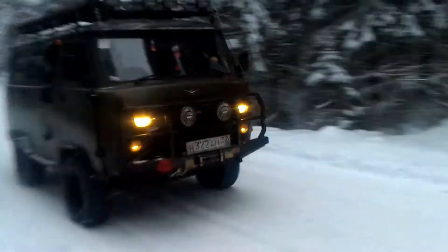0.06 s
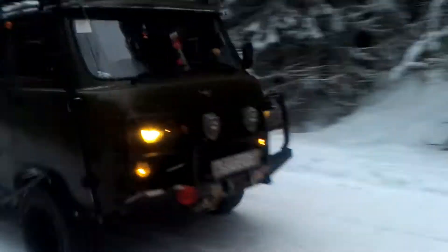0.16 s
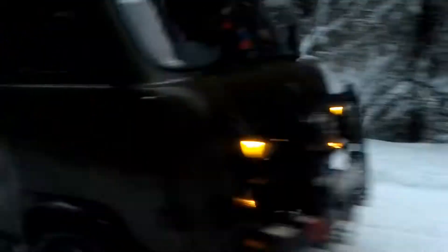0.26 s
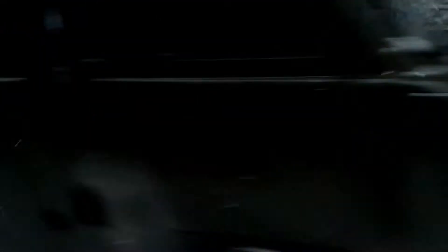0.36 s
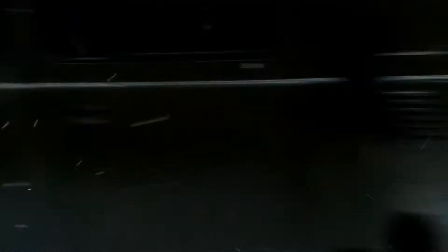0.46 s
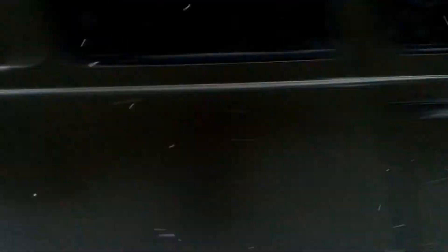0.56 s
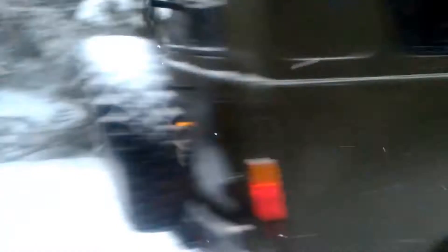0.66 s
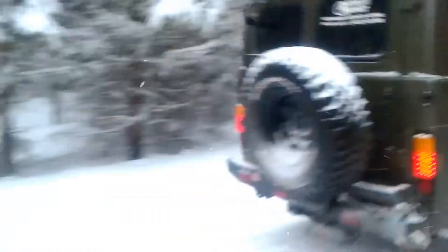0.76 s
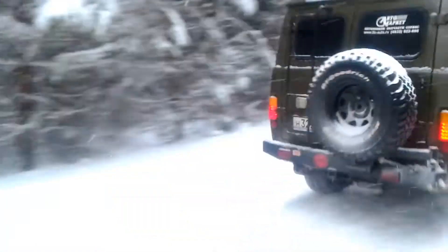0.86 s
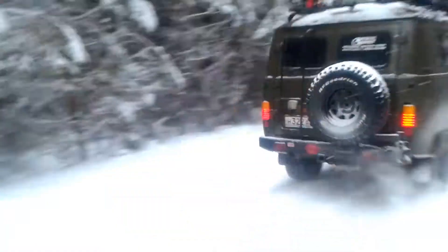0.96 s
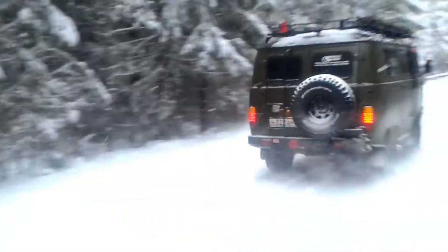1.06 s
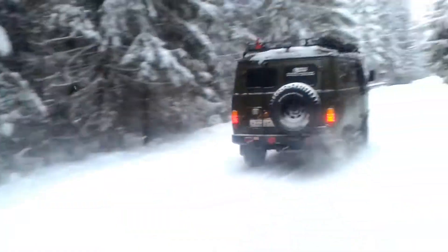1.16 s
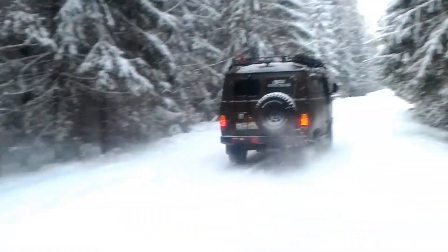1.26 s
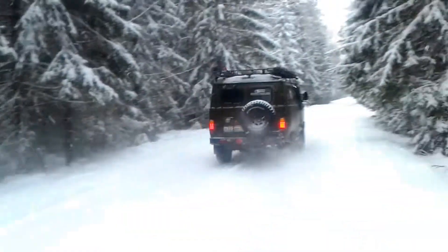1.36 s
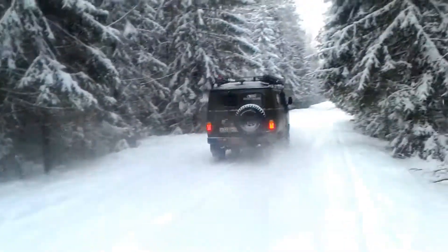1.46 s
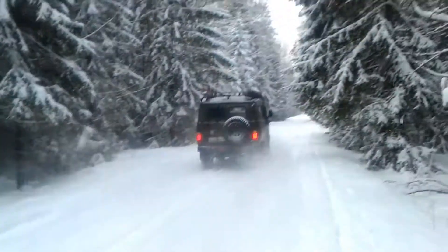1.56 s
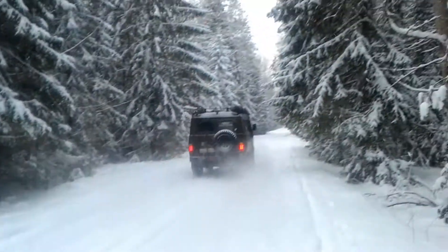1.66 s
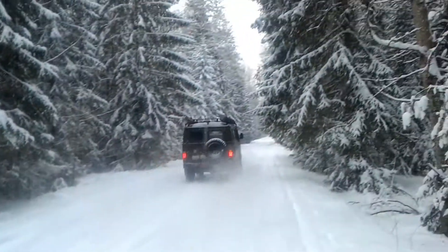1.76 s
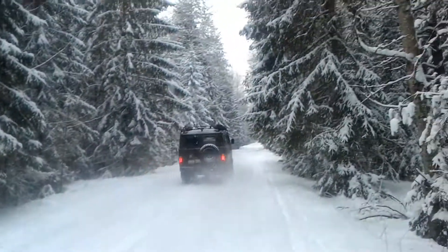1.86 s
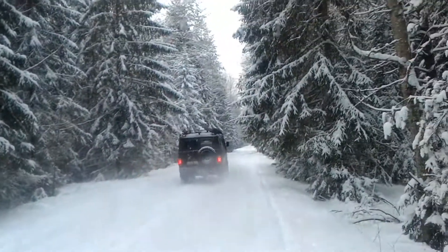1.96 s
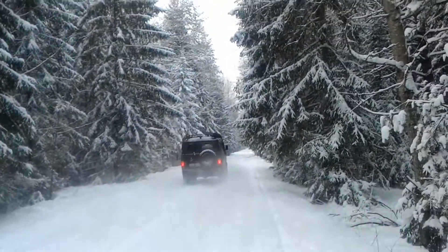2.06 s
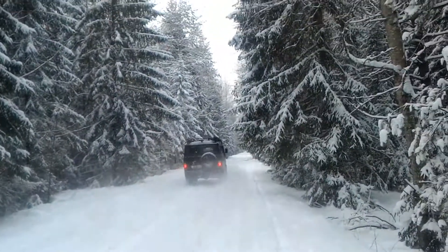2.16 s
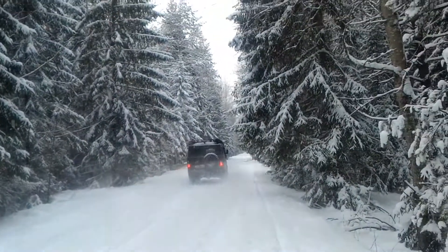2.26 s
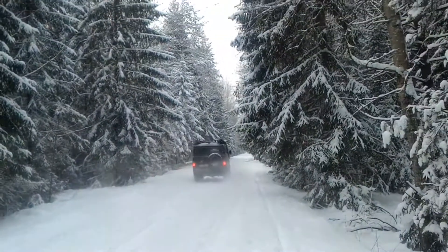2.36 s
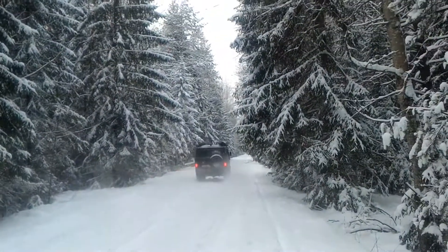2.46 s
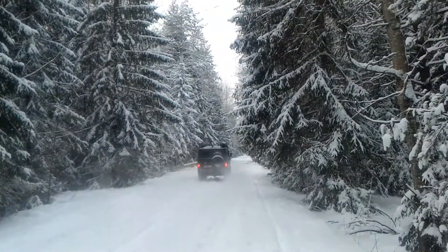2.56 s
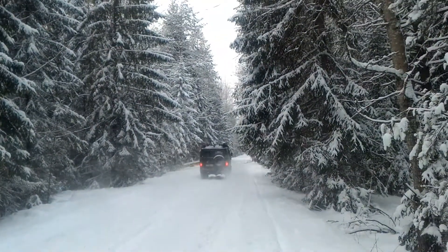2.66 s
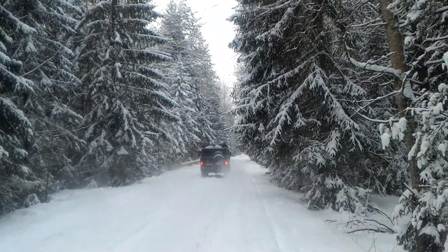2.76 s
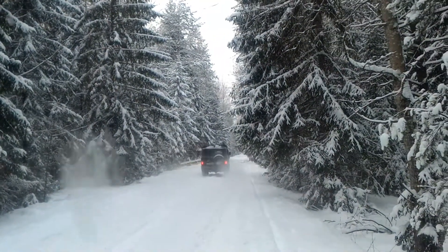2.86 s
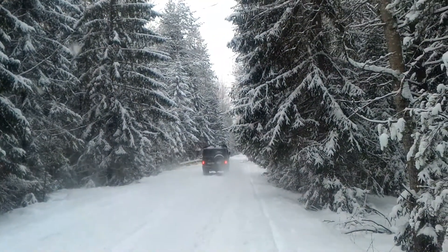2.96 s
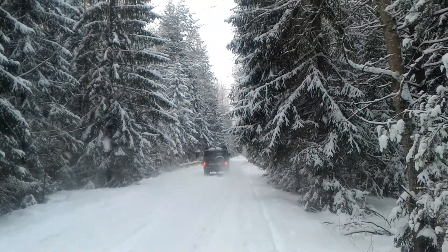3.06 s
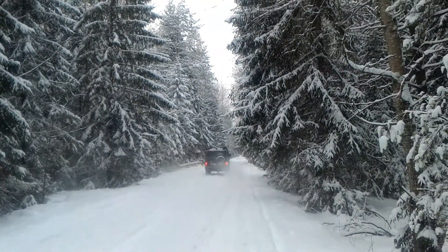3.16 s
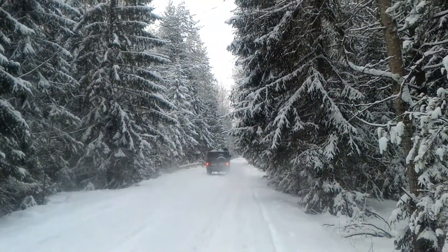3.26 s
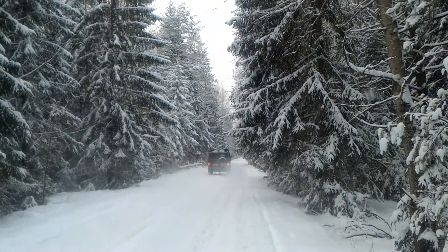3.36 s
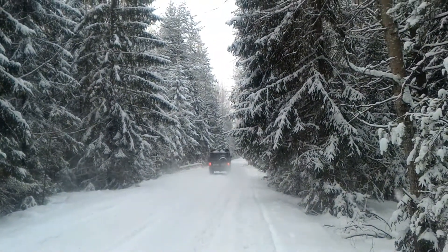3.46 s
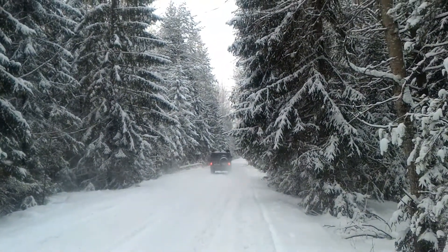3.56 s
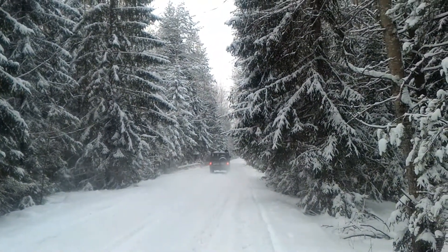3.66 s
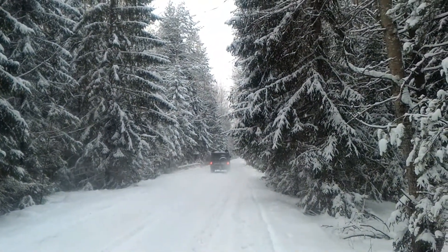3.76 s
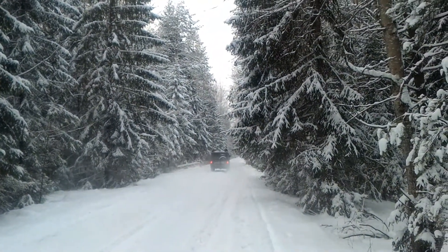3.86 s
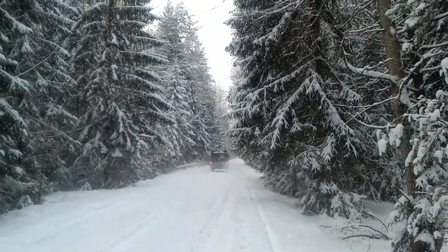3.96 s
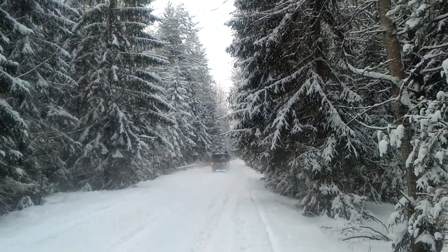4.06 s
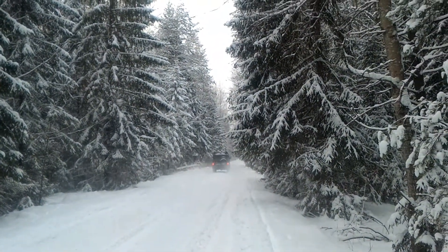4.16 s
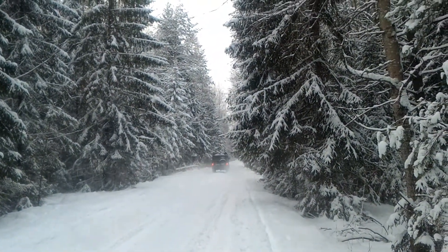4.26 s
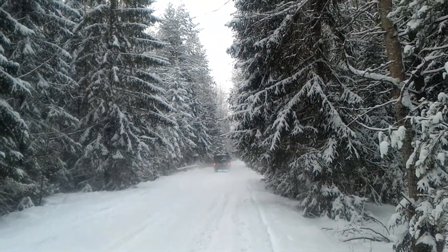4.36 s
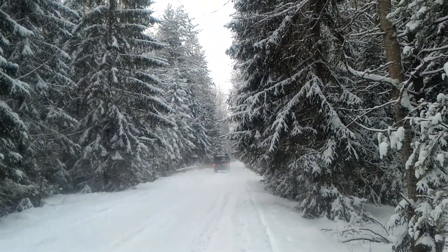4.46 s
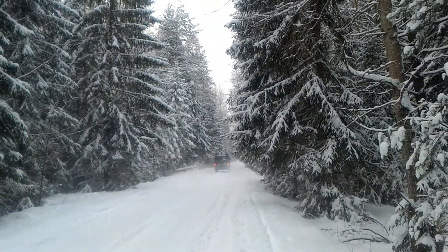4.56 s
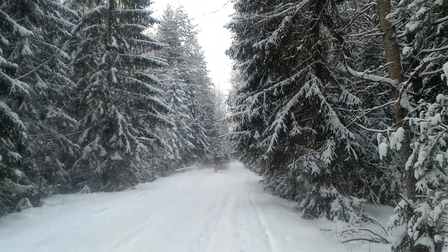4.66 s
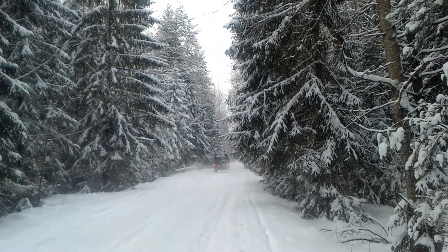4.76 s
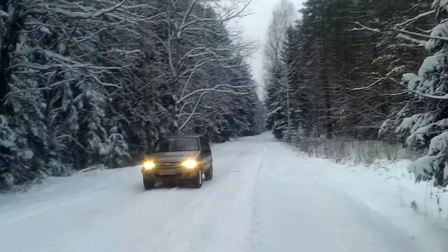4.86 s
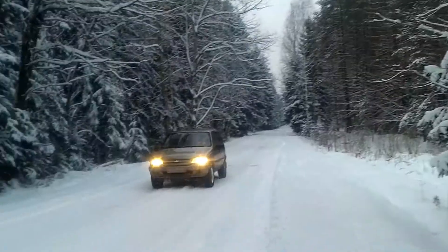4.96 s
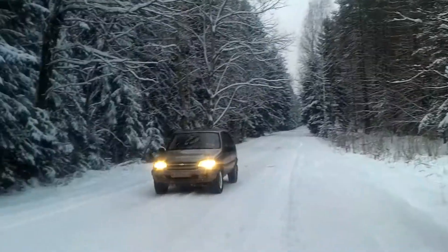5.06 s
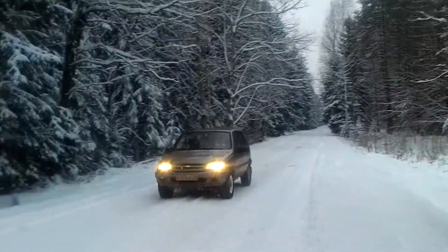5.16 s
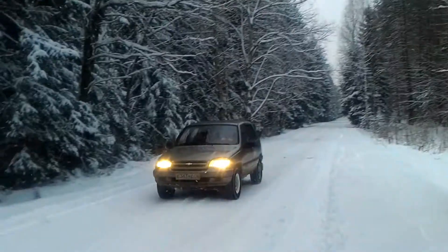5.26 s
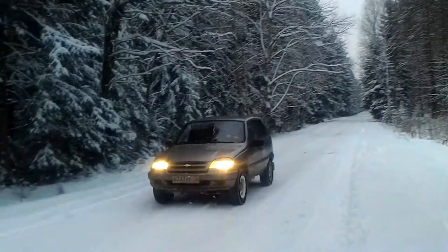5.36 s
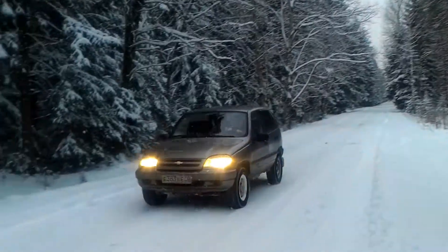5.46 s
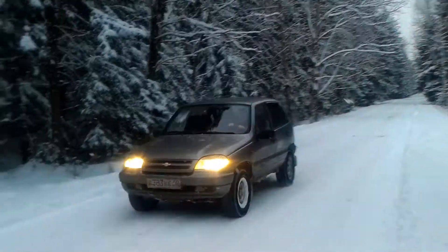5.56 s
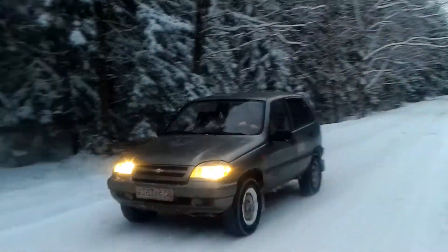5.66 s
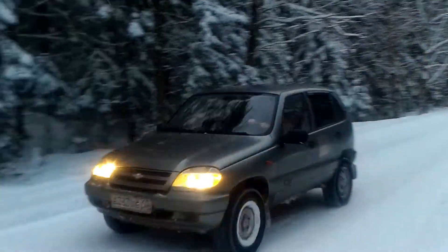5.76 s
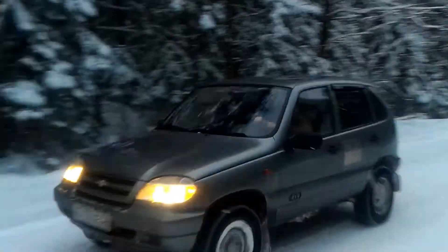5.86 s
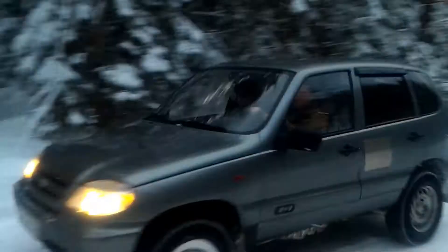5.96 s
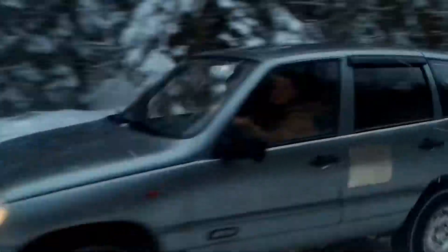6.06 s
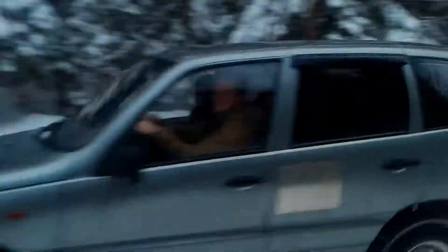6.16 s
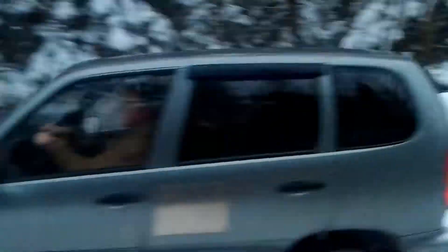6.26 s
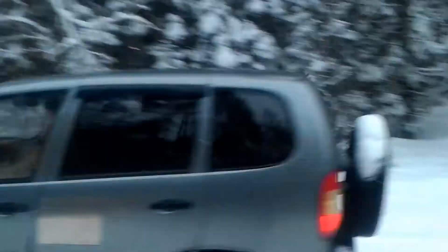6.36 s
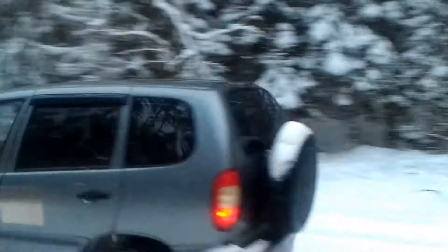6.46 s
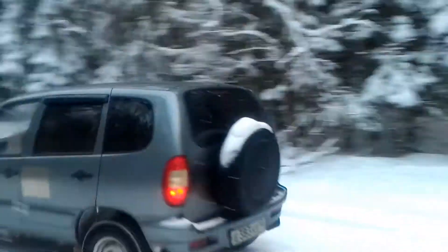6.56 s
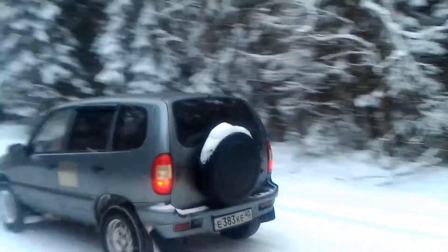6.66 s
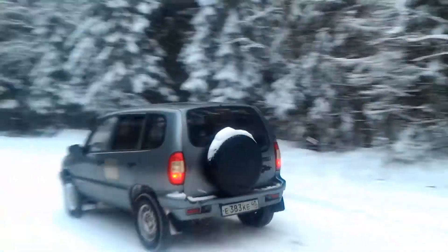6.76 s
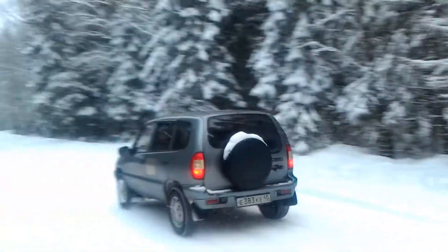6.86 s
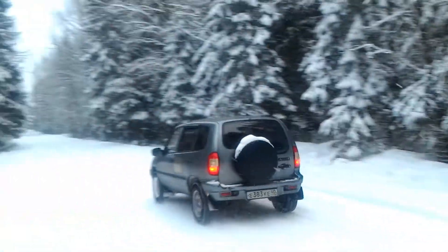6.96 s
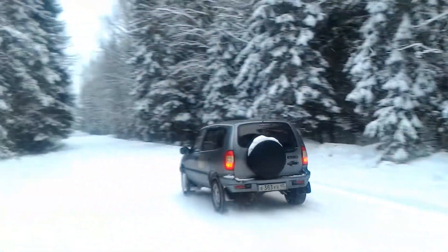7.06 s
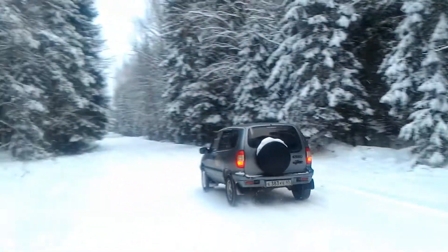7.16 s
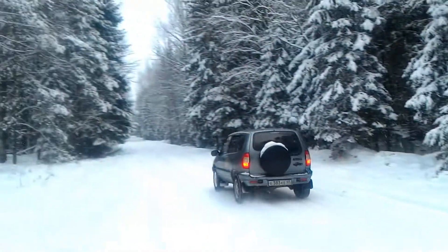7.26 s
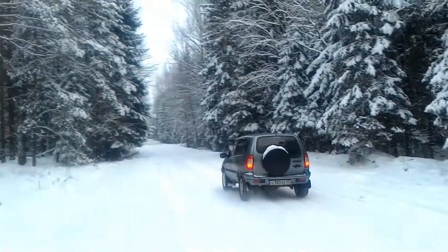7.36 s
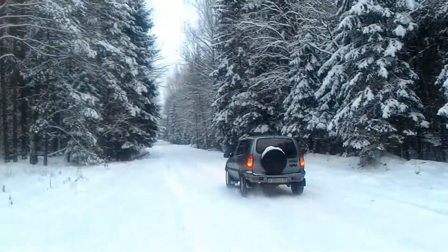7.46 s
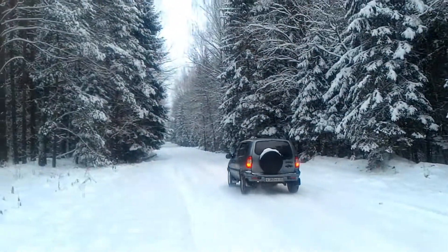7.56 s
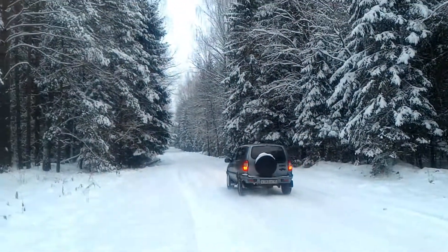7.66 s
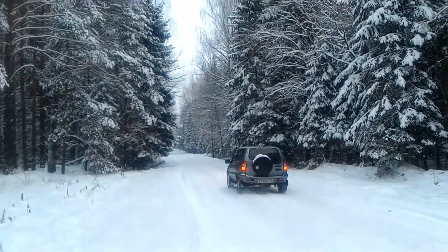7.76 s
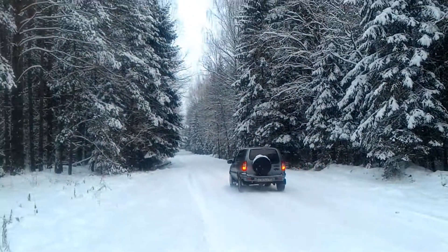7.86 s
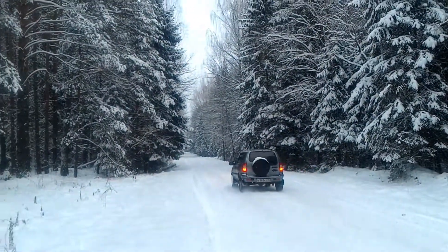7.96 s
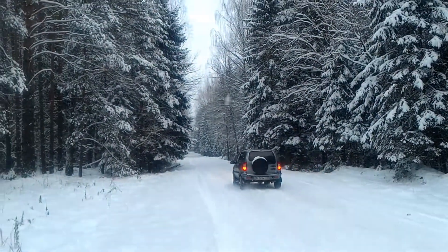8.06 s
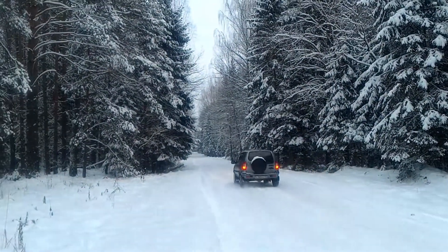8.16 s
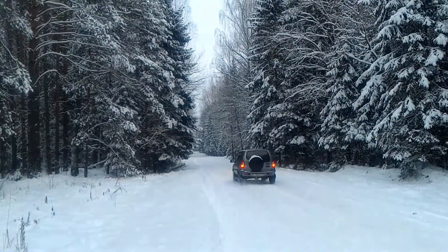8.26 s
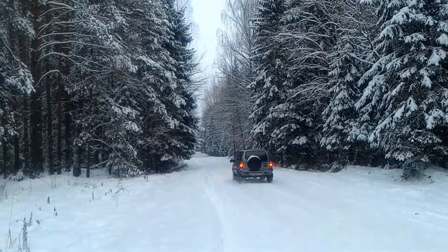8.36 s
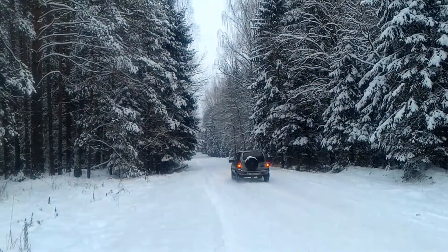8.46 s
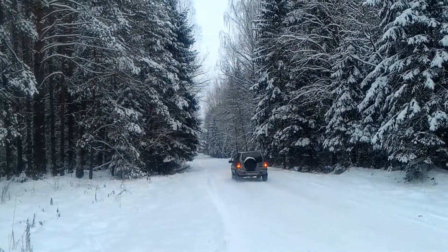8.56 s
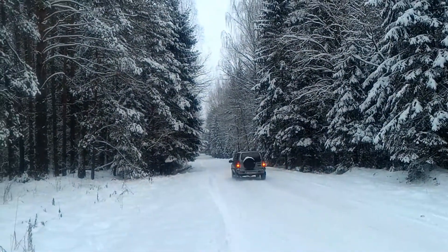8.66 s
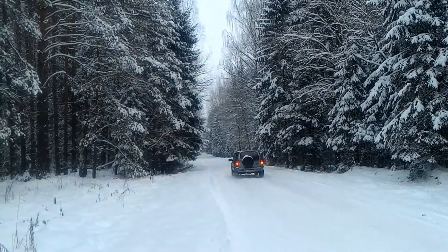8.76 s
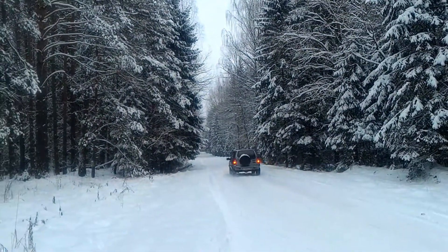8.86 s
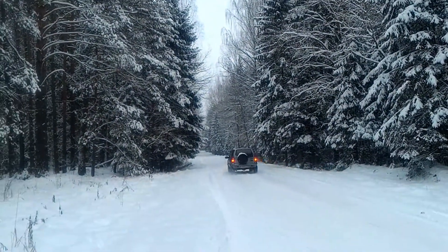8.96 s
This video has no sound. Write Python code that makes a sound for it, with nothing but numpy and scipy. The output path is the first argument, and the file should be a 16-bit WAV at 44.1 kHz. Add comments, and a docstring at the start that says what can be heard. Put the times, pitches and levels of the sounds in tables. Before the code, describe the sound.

On a snow-deadened road outdoors, a van rumbles by almost at once, very near the microphone, its tyres crunching and its raspy exhaust trailing into the distance. A few low gusts thump the microphone, then a sharp click switches to an approaching car. Its engine hum swells, the tyres roar, hiss and crackle over packed snow, and a deep exhaust note fades as it drives off, stirring a low rumble of wind.

```python
"""Two pass-bys on packed snow

A van drives close past on a snowy forest road and fades, its tailpipe rasp carrying a long way.
A sharp click cuts to a car that approaches, passes and pulls away. Each has a four-cylinder exhaust
drone, a rumble that throbs with the firings, tyres roaring and crunching on snow, and a bright hiss.
Underneath, their wakes and a few short gusts buffet the microphone."""
import sys
import numpy as np
from scipy import signal
from scipy.fft import rfft, irfft, next_fast_len
from scipy.io import wavfile

SR = 44100
rng = np.random.default_rng(int(sys.argv[2]) if len(sys.argv) > 2 else 0)


def materialize(psi):
    """Save the field psi as 16-bit PCM at rate SR to the path in sys.argv[1].

    A 1-D psi becomes a single channel; in a 2-D psi each row is a channel.
    """
    bounded = np.clip(np.atleast_2d(psi).T, -1, 1)
    quanta = np.round(bounded * 32767).astype(np.int16)
    wavfile.write(sys.argv[1], SR, quanta)


N = 397429
TIME = np.arange(N) / SR
CUT_S = 4.913   # from the van to the car

# steady drives: (abreast at t/s, speed/(m/s), gap to the microphone/m)
VAN_DRIVE = (.66, 9.616, 0.607)
CAR_DRIVE = (6.3, 7.29, 1.938)
# engines: (firing f/Hz, Doppler shift as a share of it)
VAN_FIRING = (75.4, .027)
CAR_FIRING = (53.45, .03)
# fader ride of each layer through the pass:
# (ahead level/dB, behind level/dB, swell t/s, width/s, boost/dB, holds out to/m, then loses/(dB/m))
VAN_DRONE_RIDE = (-16, -14, 0.97, -0.1, 4, 2, 0.5)
VAN_BODY_RIDE = (-22.5, -25, 0.4763, 0.49, 6.5, 13, 0.7842)
VAN_ROAR_RIDE = (-32, -39.5, 0.89, 0.06, 0.5, 23.5, 0.3361)
VAN_SPRAY_RIDE = (-32, -40.5, 9.5, -2.1, -1, 5.5, 1.5)
CAR_DRONE_RIDE = (-32.5, -17, 6, 0.67, 12.5, 10, 1)
CAR_BODY_RIDE = (-31.5, -32, 6, 0.5662, 7, 11, 1.1156)
CAR_ROAR_RIDE = (-36.5, -41, 6, 0.6654, 2.5, 9, 0.75)
CAR_SPRAY_RIDE = (-42.5, -44.5, 6, 0.4326, 7, 10, 0.5378)
# van exhaust overtones: (multiple of the firing rate, level/dB against the rumble)
VAN_ORDERS = [(1.5, -20), (2, -13.5), (2.5, -16), (3, -18.5), (3.5, -16), (4, -18)]
# car exhaust overtones: (multiple of the firing rate, front level/dB, rear level/dB)
CAR_ORDERS = [(1.5, -11.5, -5), (2, 0, 2.5), (3, -4.5, -7), (4, -14, -10.5), (5, -15, -4.5),
              (7, -15, -16.5), (8, -17.5, -16.5), (9, -24, -20)]
# EQ of the exhaust rumble, close by and leaving: (f/Hz, level/dB)
VAN_RUMBLE_NEAR = [(60, -18.5), (110, -2.5), (170, -6), (230, 2), (320, -0.5), (450, -2.5), (640, -11.5),
                   (850, -33), (1400, -53)]
VAN_RUMBLE_AWAY = [(60, -4), (115, -3), (180, 1.5), (240, -3), (320, -6.5), (450, -7.5), (550, -12.5),
                   (680, -21), (1200, -51)]
CAR_RUMBLE_NEAR = [(60, -12.5), (90, 3), (140, -3), (200, 0.5), (275, -2.5), (420, -6), (540, -11),
                   (680, -29), (1200, -43.5)]
CAR_RUMBLE_AWAY = [(60, -15), (90, -1.5), (140, -9), (180, -7), (250, -3), (330, -8), (430, -9), (620, -23),
                   (1000, -46.5)]
# EQ of tyre roar and tread drumming: (f/Hz, level/dB)
VAN_ROAR_EQ = [(300, -19), (620, -16), (800, -1), (920, -2.5), (1100, 1), (1250, 0.5), (1430, -2),
               (1600, -6.5), (1850, -15), (2600, -32)]
CAR_ROAR_EQ = [(300, -16.5), (620, -11), (800, -2), (930, -2), (1080, 1), (1280, -1), (1480, -7),
               (1700, -15), (2600, -37)]
TREAD_EQ = [(300, -21), (470, 1.5), (620, -3), (780, -5), (1050, -25.5)]
# EQ of snow spray and of the van's tailpipe rasp: (f/Hz, level/dB)
VAN_SPRAY_EQ = [(1000, -35.5), (1600, -7), (1900, -9.5), (2250, -1), (2900, -5.5), (4050, -5),
                (5400, -20.5), (6200, -23), (9000, -24.5), (11500, -54)]
CAR_SPRAY_NEAR = [(1000, -37.5), (1750, -6.5), (2000, -2.5), (2250, -5.5), (2570, -2), (3000, -3.5),
                  (3600, -3.5), (4680, -9.5), (5600, -20.5), (7600, -19.5), (9000, -21), (11300, -44)]
CAR_SPRAY_AWAY = [(1600, -18.5), (1800, -5), (2050, 1.5), (2250, -3.5), (2520, 1.5), (2950, -10.5),
                  (3250, -1.5), (3890, -10), (4550, -4.5), (5400, -23), (7460, -17), (9500, -23.5),
                  (14000, -47.5)]
RASP_REAR = [(1200, -46.5), (1900, -12.5), (2150, -3.5), (2400, -2), (2700, 0), (3080, -1), (3400, -11),
             (3800, -4.5), (4090, 1.5), (4350, -3.5), (4680, -16.5), (5000, -10), (5750, -21), (8900, -23),
             (11400, -46.5)]
RASP_FAR = [(1850, -28.5), (2100, -9), (2400, -8), (2600, -0.5), (2780, -3), (3070, -4.5), (3360, -13),
            (3800, -14), (4200, -7.5), (4550, -13), (4840, -32), (5300, -24), (6000, -33.5), (8500, -31.5),
            (14000, -50)]
# surges of the van's rasp and gear whine: (t/s, peak level/dB, attack/s, decay/s)
RASP_SURGES = [(1.21, -34.5, 0.068, 1.08), (2.8, -43.5, 0.212, 3.2), (4.05, -43.5, 0.144, 3.0),
               (4.06, -41, 0.017, 0.069)]
WHINE_FLARES = [(.1, -49.5, .2, .3), (.51, -31.5, 0.072, 0.23), (2.05, -44, 0.103, 0.15),
                (2.7, -43.5, 0.153, 0.47)]
# swells of the rasp's two resonances: (t/s, width/s, level/dB)
LOW_RING_SWELLS = [(1.26, 0.18, -41.5), (1.71, 0.085, -42), (4.255, 0.049, -36.5), (4.54, 0.125, -45.5)]
HIGH_RING_SWELLS = [(1.33, 0.102, -39), (1.66, 0.142, -42.5)]
# the car's whistle swells as nose, then tail go by: (t/s, width/s, level/dB)
WHISTLE_SWELLS = [(5.72, 0.242, -39.5), (6.74, 0.307, -48)]
# treads drum as each vehicle draws level: (t/s, width/s, level/dB)
TREAD_SWELLS = [(.57, 0.28, -30), (5.97, 0.395, -36.5)]
# snow crusts breaking under a tyre: (t/s, centre f/Hz, level/dB, decay/s)
CRUNCHES = [(0.564, 1007, -27.5, 0.0123), (0.635, 2096, -24, 0.0062), (1.182, 4300, -33, 0.0076),
            (1.262, 4100, -24, 0.0054), (1.282, 4160, -30, 0.0064), (5.622, 1010, -29.5, .007),
            (5.642, 1110, -22, 0.0048), (5.678, 1120, -31.5, 0.0059), (5.86, 1080, -35.5, 0.0067),
            (5.909, 985, -31.5, 0.0122), (5.995, 1095, -24, 0.0057), (5.996, 3080, -30, 0.005),
            (6.098, 1044, -28, .008), (6.137, 1074, -26.5, 0.0068), (6.172, 1247, -24, 0.0048),
            (6.277, 2306, -29.5, 0.0144)]
# air dragged along by each vehicle: (peak t/s, level/dB, fall either side/(dB/s))
VAN_WAKE = (0.4, -22.5, 4.07)
CAR_WAKE = (6.34, -18, 8.72)
# single gusts: (t/s, width/s, level/dB)
GUSTS = [(3.99, 0.0605, -24.5), (4.068, 0.0296, -20.5), (4.263, 0.0457, -22), (4.36, 0.033, -26),
         (4.55, 0.2, -33), (4.85, 0.069, -26), (5.42, 0.074, -21.5)]
# EQ of wakes and gusts: (f/Hz, level/dB)
WAKE_EQ = [(10, -35.5), (22, -8.5), (36, -3), (48, -0.5), (65, -5), (95, -17), (140, -18.5), (300, -46)]
GUST_EQ = [(12, -20.5), (30, 6), (74, -3.5), (120, -14), (280, -24.5), (600, -66)]


def van():
    """The close pass: exhaust and tyres for weight, hiss and gear whine on top."""
    phase = firing_phase(VAN_DRIVE, *VAN_FIRING, jitter=0.00406)
    return van_exhaust(phase) + van_tyres() + van_hiss(phase) + van_whine()


def car():
    """The wider pass: a hum on approach, a deep exhaust note once it is by."""
    phase = firing_phase(CAR_DRIVE, *CAR_FIRING, jitter=0.001997)
    return car_exhaust(phase) + car_tyres(phase) + car_gears() + snow_squeak() + car_whistle()


def van_exhaust(phase):
    """Firings make a drone, overtones and a throbbing rumble; the drone is lost among the trees."""
    drone_gain = from_db(passing(VAN_DRIVE, *VAN_DRONE_RIDE) + 0.5 * drift(5.0))
    drone = drone_gain * crossfade(np.sqrt(2) * np.sin(phase), 0, 2.47, 3.725)
    near = coloured(puffs(phase, depth_db=1.5), VAN_RUMBLE_NEAR)
    away = coloured(puffs(phase, depth_db=1.5), VAN_RUMBLE_AWAY)
    rumble = crossfade(near, away, 1.0, 1.492)
    hum = overtones(phase, VAN_ORDERS, waver_db=2.5, wobble_rad=0.18)
    return drone + from_db(passing(VAN_DRIVE, *VAN_BODY_RIDE)) * (rumble + hum)


def car_exhaust(phase):
    """A drone at the firing rate; overtones and rumble change colour as the tail comes round."""
    drone_gain = from_db(passing(CAR_DRIVE, *CAR_DRONE_RIDE) + 0.5 * drift(5.4))
    drone = drone_gain * np.sqrt(2) * np.sin(phase)
    orders = [(k, np.interp(TIME, [6.1, 6.65], [front, rear])) for k, front, rear in CAR_ORDERS]
    hum = overtones(phase, orders, waver_db=1.41, wobble_rad=0.12)
    near = coloured(puffs(phase, depth_db=3.0), CAR_RUMBLE_NEAR)
    away = coloured(puffs(phase, depth_db=3.0), CAR_RUMBLE_AWAY)
    rumble = crossfade(near, from_db(-0.49) * away, 6.06, 6.55)
    return drone + from_db(passing(CAR_DRIVE, *CAR_BODY_RIDE)) * (rumble + hum)


def firing_phase(drive, rate_hz, shift, jitter):
    """Angle of the firing cycle: never quite steady, and dropping in pitch through the pass."""
    _, bearing = road(*drive)
    hz = rate_hz * (1 - shift * bearing) * (1 + jitter * drift(15.3))
    return 2 * np.pi * np.cumsum(hz) / SR


def overtones(phase, orders, waver_db, wobble_rad):
    """Exhaust partials, each wavering in level and phase; unequal cylinders add half orders."""
    hum = np.zeros(N)
    for order, db in orders:
        gain = np.sqrt(2) * from_db(db + waver_db * drift(5.4))
        hum += gain * np.sin(order * phase + wobble_rad * drift(7.5) + rng.uniform(0, 2 * np.pi))
    return hum


def puffs(phase, depth_db):
    """Turbulence that swells at every firing."""
    return rms_one(white() * from_db(depth_db * np.cos(phase)))


def van_tyres():
    """Tyres on packed snow: a grainy midrange roar."""
    rough_patch_db = 1.67 * bump(3.033, 0.175)
    gain = from_db(passing(VAN_DRIVE, *VAN_ROAR_RIDE) + rough_patch_db + 0.51 * drift(11.0))
    return gain * coloured(white() + 0.54 * grains(2500, spread_db=4.0), VAN_ROAR_EQ)


def car_tyres(phase):
    """Tyre roar and bright spray, shaken together by uneven snow."""
    ruts_db = 0.99 * drift(11.7)
    grit = bump(5.725, 0.67) * grains(170, spread_db=0.0)   # coarse, heard only close by
    rolling = puffs(phase, depth_db=0.5) + 0.367 * grains(2500, spread_db=4.5) + 0.497 * grit
    roar = from_db(passing(CAR_DRIVE, *CAR_ROAR_RIDE) + ruts_db) * coloured(rolling, CAR_ROAR_EQ)
    spray = puffs(phase, depth_db=1.0) + 0.803 * grains(4000, spread_db=-0.5) + 0.412 * grit
    hiss = crossfade(coloured(spray, CAR_SPRAY_NEAR), coloured(spray, CAR_SPRAY_AWAY), 6.6, 7.2)
    return roar + from_db(passing(CAR_DRIVE, *CAR_SPRAY_RIDE) + ruts_db) * hiss


def grains(per_s, spread_db):
    """Snow breaks under the tread: random ticks of uneven size; more spread makes a few stand out."""
    sizes = from_db(spread_db * np.minimum(rng.exponential(1, N), 4))
    return rms_one(white() * sizes * (rng.random(N) < per_s / SR))


def van_hiss(phase):
    """Flickering treble: spray close by, then a puffing tailpipe rasp that rings at two pitches."""
    spray = coloured(white() + 0.62 * grains(4300, spread_db=4.0), VAN_SPRAY_EQ)
    spray *= from_db(passing(VAN_DRIVE, *VAN_SPRAY_RIDE))
    gas = puffs(phase, depth_db=0.8) + 0.5 * grains(700, spread_db=1.0)   # flung snow patters in it
    rasp = surges(RASP_SURGES) * crossfade(coloured(gas, RASP_REAR), coloured(gas, RASP_FAR), 3.096, 4.086)
    low_ring = swells(LOW_RING_SWELLS) * narrow_band(2675, width_hz=42)
    high_ring = swells(HIGH_RING_SWELLS) * narrow_band(4090, width_hz=110)
    return from_db(drift(19.1)) * (spray + rasp + low_ring + high_ring)


def van_whine():
    """Gear whine: a trembling, rough-edged tone that flares, then is lost among the trees."""
    hz = np.interp(TIME, [0.4, 0.75], [2260, 2125])   # drops as the van goes by
    core = np.sqrt(2) * np.sin(2 * np.pi * np.cumsum(hz + 34.25 * drift(70)) / SR)
    whine = 0.75 * core + 0.66 * narrow_band(hz, width_hz=59.7)
    whine += crossfade(0.59 * narrow_band(hz, width_hz=380), 0, 0.63, 1.9)   # wrapped in a rasp
    whine += crossfade(0.654 * narrow_band(hz / 2, width_hz=45), 0, 1.0, 2.7)   # sub-octave, nearby
    whine += 0.81 * bump(0.54, 0.11) * narrow_band(1.22 * hz, width_hz=260)   # rasp from the flank
    gain = np.hypot(from_db(-53.5), surges(WHINE_FLARES))   # a steady floor between flares
    return gain * crossfade(whine, 0, 2.9, 3.8)


def car_whistle():
    """A hollow ring in the hiss: higher the nearer the car, narrower from behind."""
    far_hz, rise_hz, range_m = 2419.3, 1006.8, 3.0
    distance, _ = road(*CAR_DRIVE)
    hz = far_hz + rise_hz / (1 + (distance ** 2 - distance.min() ** 2) / range_m ** 2)
    ring = crossfade(narrow_band(hz, width_hz=316), narrow_band(hz, width_hz=220), 6.0, 6.89)
    return (from_db(-54.5) + swells(WHISTLE_SWELLS)) * ring


def car_gears():
    """A soft whirr of gears, heard from alongside."""
    return from_db(-40.0) * bump(6.243, 0.362) * narrow_band(2063.6, width_hz=250)


def snow_squeak():
    """Snow gives one brief, falling squeak."""
    hz = np.interp(TIME, [4.96, 5.02], [4350, 3850])
    return from_db(-42.5) * bump(4.99, 0.034) * narrow_band(hz, width_hz=220)


def treads():
    """A hollow, grainy drumming of treads on snow, heard only from alongside."""
    return swells(TREAD_SWELLS) * coloured(grains(900, spread_db=-5.5), TREAD_EQ)


def crunches(half_band=0.137):
    """Single crusts give way: short noise bursts, each about one pitch."""
    track, age = np.zeros(N + SR), TIME[:SR // 4]
    for at_s, hz, db, decay_s in CRUNCHES:
        band = signal.butter(2, [hz * (1 - half_band), hz * (1 + half_band)], "band", fs=SR, output="sos")
        envelope = np.exp(-age / decay_s)
        burst = rms_one(signal.sosfilt(band, rng.standard_normal(len(age)) * envelope + 1e-18))
        start = int(at_s * SR)
        track[start:start + len(age)] += from_db(db) * burst * np.sqrt(np.mean(envelope ** 2))
    return signal.sosfilt(signal.butter(8, 6500, fs=SR, output="sos"), track[:N] + 1e-18)


def click(height, decay_s):
    """A one-sided snap on the cut."""
    age = TIME - CUT_S
    return -height * (age >= 0) * np.exp(-np.abs(age) / decay_s)


def wind():
    """Low buffeting from the vehicles' wakes, and a few short gusts."""
    wakes = np.where(TIME < CUT_S, wake(*VAN_WAKE), wake(*CAR_WAKE))
    return wakes * coloured(white(), WAKE_EQ) + swells(GUSTS) * coloured(white(), GUST_EQ)


def wake(at_s, db, fall_db_per_s):
    """Gain of the stirred air, strongest as the vehicle goes by."""
    return from_db(db - fall_db_per_s * np.abs(TIME - at_s))


def road(at_s, speed, gap_m):
    """A steady drive: distance in m, and bearing from -1 (approaching) to 1 (leaving)."""
    along = speed * (TIME - at_s)
    distance = np.hypot(along, gap_m)
    return distance, along / distance


def passing(drive, ahead_db, behind_db, swell_s, width_s, swell_db, carries_m, loss_db_per_m):
    """Fader ride in dB: front gives way to rear, with one swell and a fade over distance."""
    distance, bearing = road(*drive)
    facing_db = ahead_db + (behind_db - ahead_db) * (1 + bearing) / 2
    loss_db = loss_db_per_m * np.maximum(distance - carries_m, 0)
    return facing_db + swell_db * bump(swell_s, width_s) - loss_db


def crossfade(before, after, start_s, end_s):
    """Equal-power blend from one sound to the next."""
    share = np.clip((TIME - start_s) / (end_s - start_s), 0, 1)
    return np.sqrt(1 - share) * before + np.sqrt(share) * after


def bump(at_s, width_s):
    """A bell-shaped envelope of height 1."""
    return np.exp(-((TIME - at_s) / width_s) ** 2)


def swells(rows):
    """Joint gain of smooth, even-sided swells."""
    return sum(from_db(db) * bump(at_s, width_s) for at_s, width_s, db in rows)


def surges(rows):
    """Joint gain of surges with a quick attack and a longer tail."""
    gains = [from_db(db) * np.where(TIME < at_s, bump(at_s, attack), np.exp(-np.abs(TIME - at_s) / decay))
             for at_s, db, attack, decay in rows]
    return np.linalg.norm(gains, axis=0)


def narrow_band(hz, width_hz):
    """Pitched noise about a fixed or gliding centre."""
    angle = 2 * np.pi * np.cumsum(np.broadcast_to(hz, N)) / SR
    return drift(width_hz) * np.cos(angle) + drift(width_hz) * np.sin(angle)


def drift(rate_hz):
    """Smooth random modulation with spread 1."""
    hop, run_in = 20, 2000
    pole = np.exp(-2 * np.pi * rate_hz * hop / SR)
    noise = rng.standard_normal(N // hop + run_in + 2)
    slow = signal.lfilter([1], [1, -2 * pole, pole * pole], noise)[run_in:]
    return np.interp(np.arange(N) / hop, np.arange(len(slow)), rms_one(slow))


def coloured(x, eq):
    """Shape x with an EQ curve, then scale to unit power."""
    size = next_fast_len(N)
    hz, db = np.transpose(eq)
    bins = np.maximum(np.arange(size // 2 + 1) * SR / size, 1)
    gain = from_db(np.interp(np.log(bins), np.log(hz), db, left=-100, right=-100))
    return rms_one(irfft(rfft(x, size) * gain, size)[:N])


def white():
    """Fresh white noise."""
    return rng.standard_normal(N)


def from_db(db):
    """Decibels to gain."""
    return 10 ** (np.asarray(db) / 20)


def rms_one(x):
    """Scale to unit power."""
    return x / np.sqrt(np.mean(x ** 2) + 1e-20)


def scene():
    """First the van, then the car: a dry mono mix, as in open air deadened by snow."""
    vehicles = np.where(TIME < CUT_S, van(), car()) + treads() + crunches()
    return (vehicles + wind() + click(height=1.54, decay_s=0.0001))[None]


def record(dry):
    """A steep high cut, 70 dB down at 16.5 kHz."""
    return signal.sosfilt(signal.cheby2(12, 70, 16500, fs=SR, output="sos"), dry)


dry = scene()
out = record(dry)
materialize(out)
```